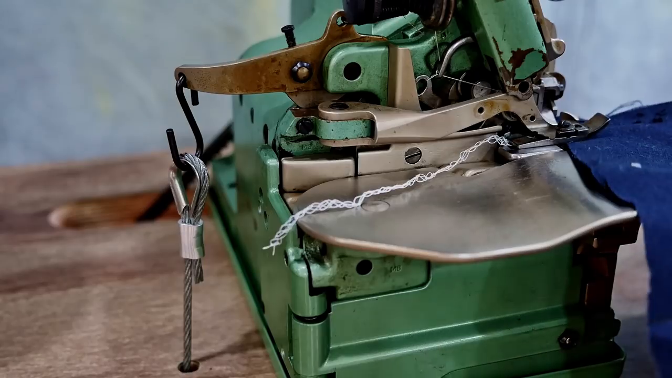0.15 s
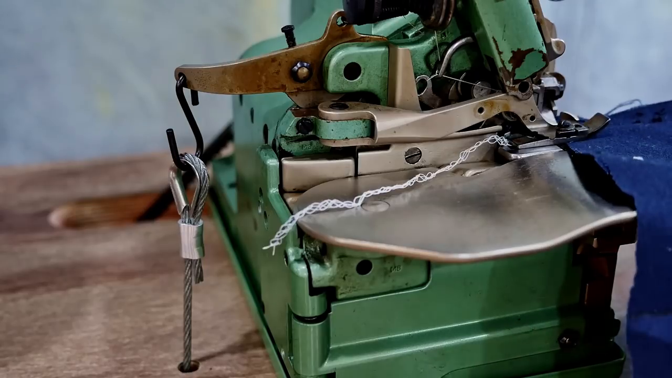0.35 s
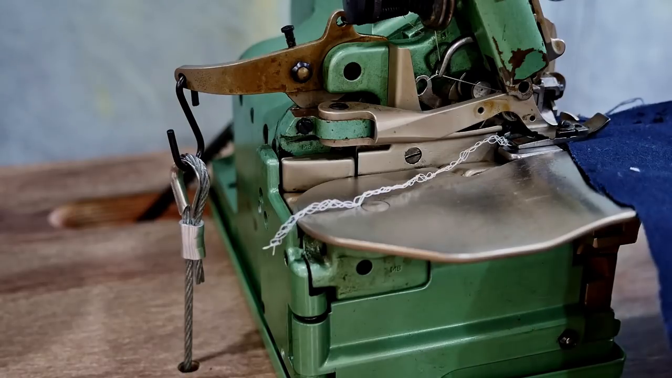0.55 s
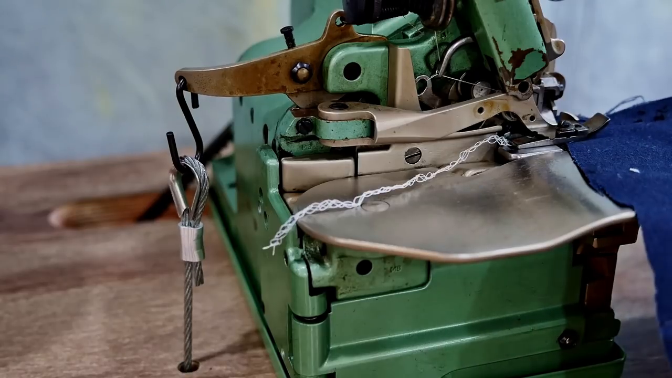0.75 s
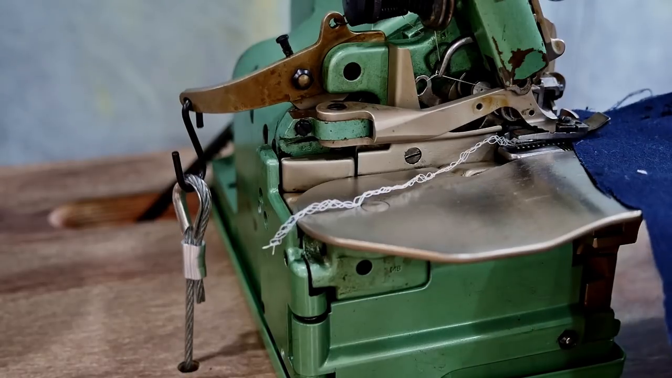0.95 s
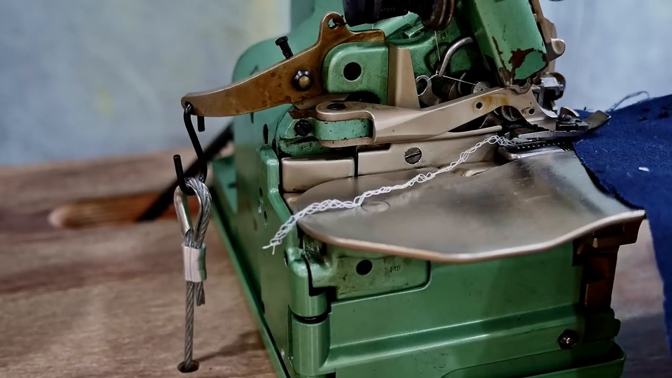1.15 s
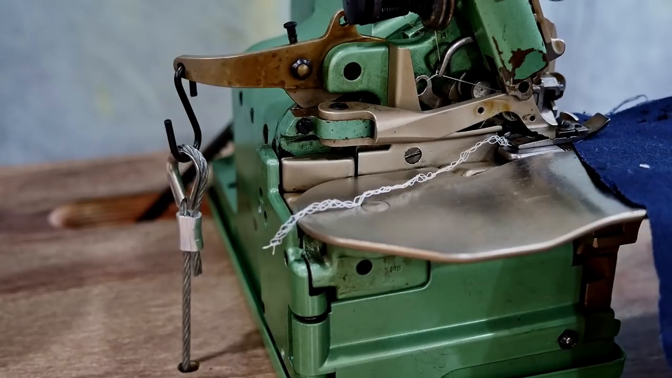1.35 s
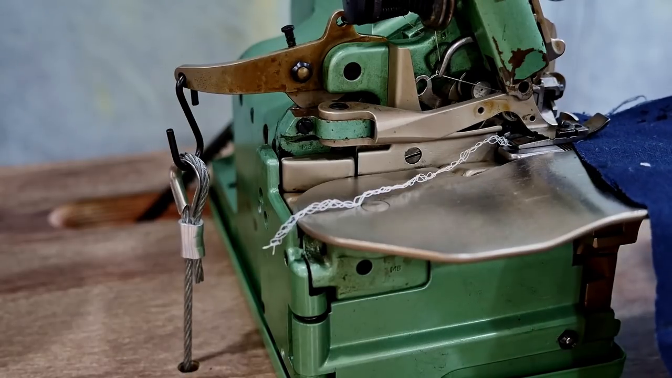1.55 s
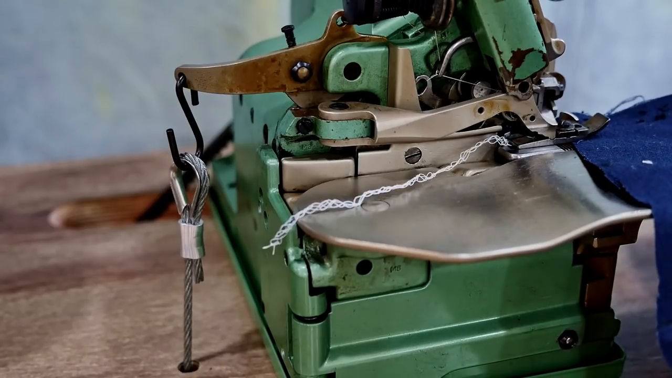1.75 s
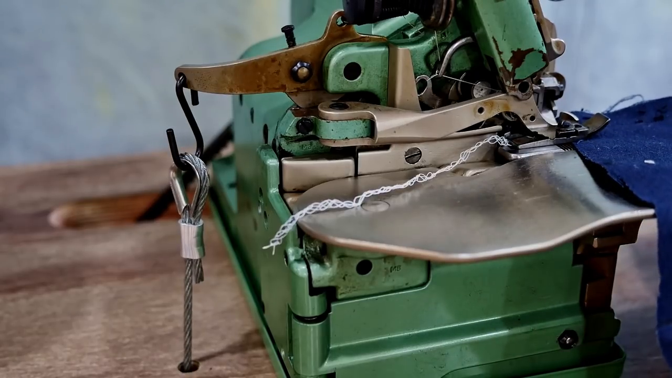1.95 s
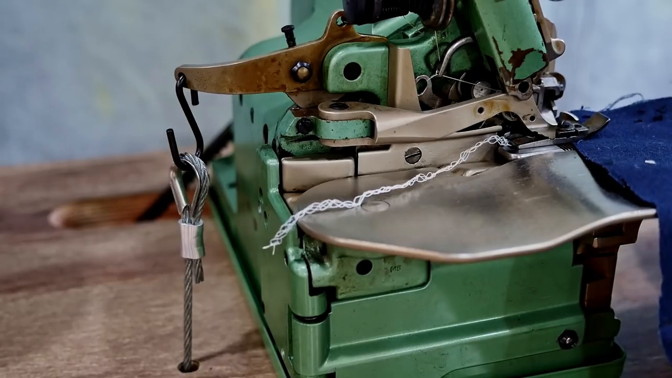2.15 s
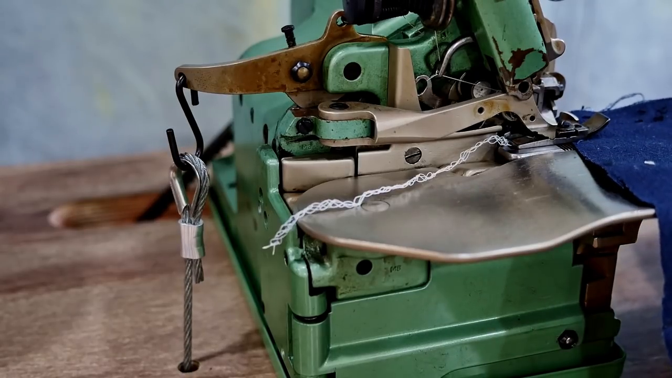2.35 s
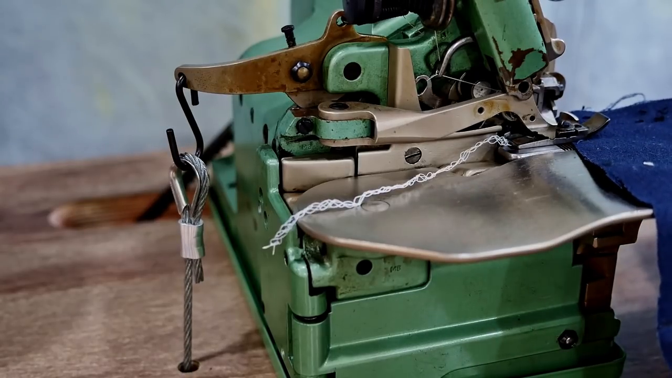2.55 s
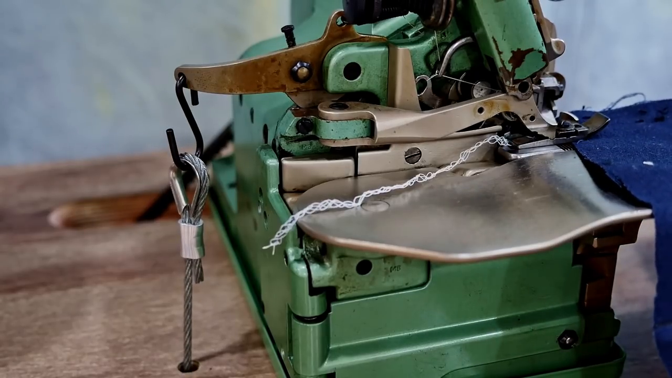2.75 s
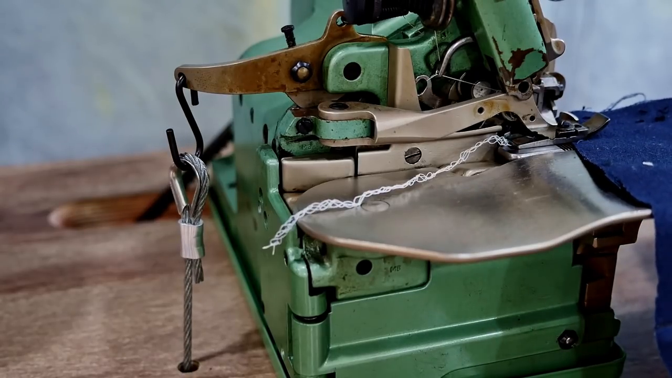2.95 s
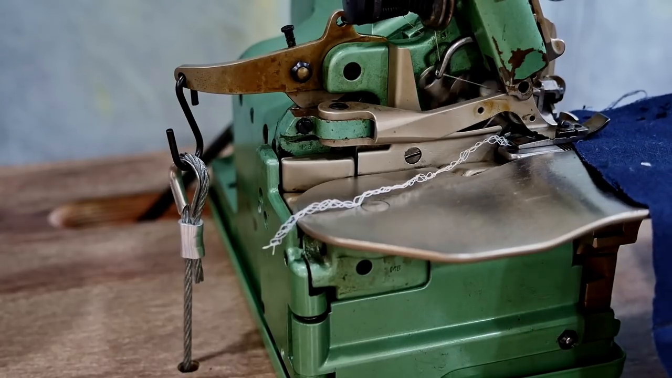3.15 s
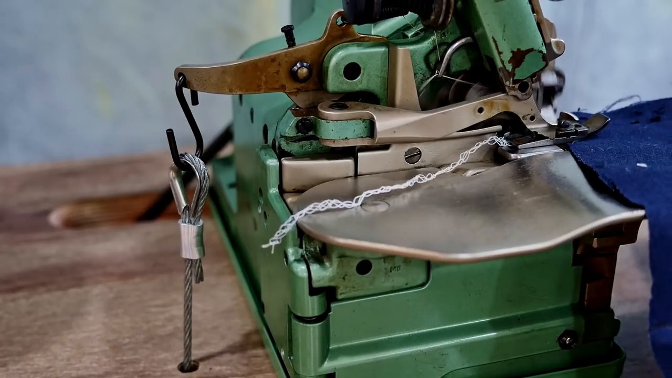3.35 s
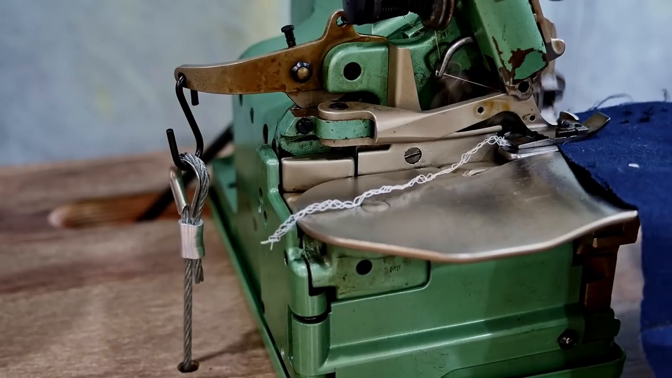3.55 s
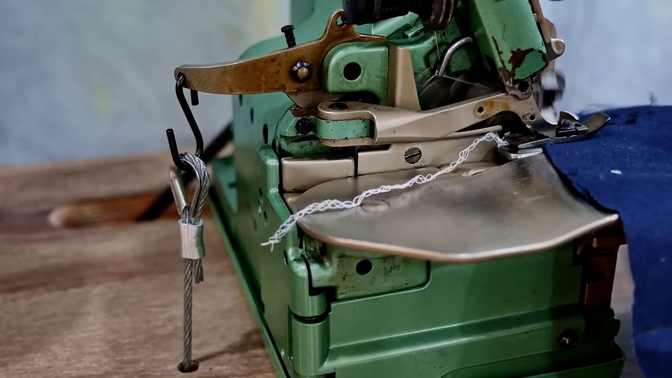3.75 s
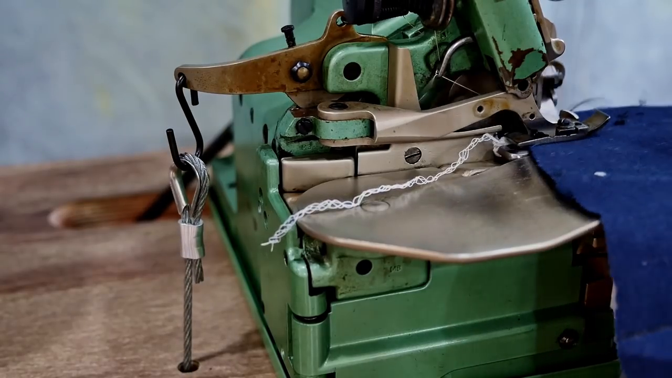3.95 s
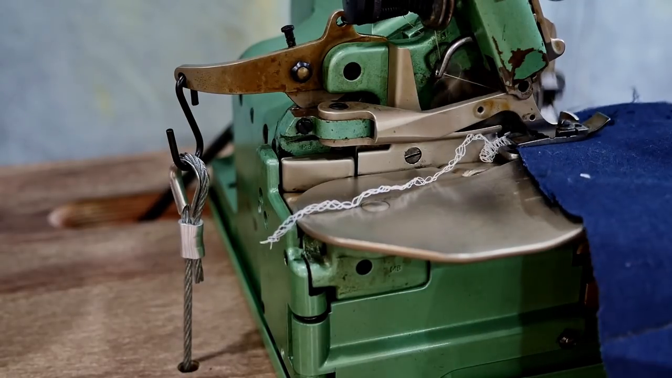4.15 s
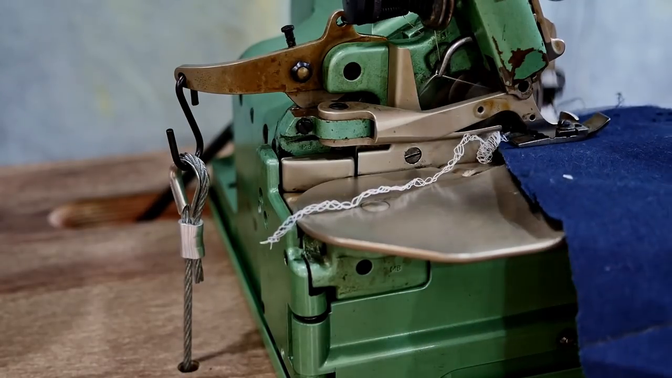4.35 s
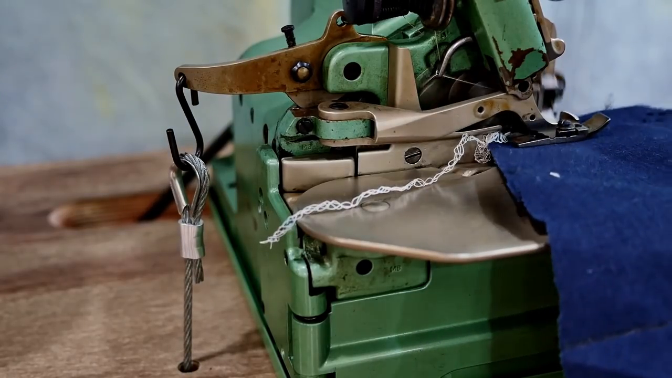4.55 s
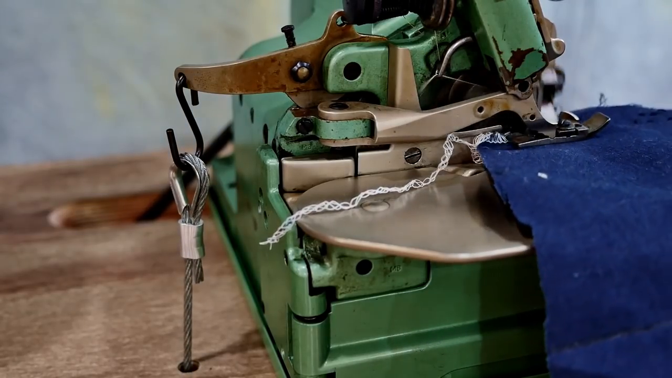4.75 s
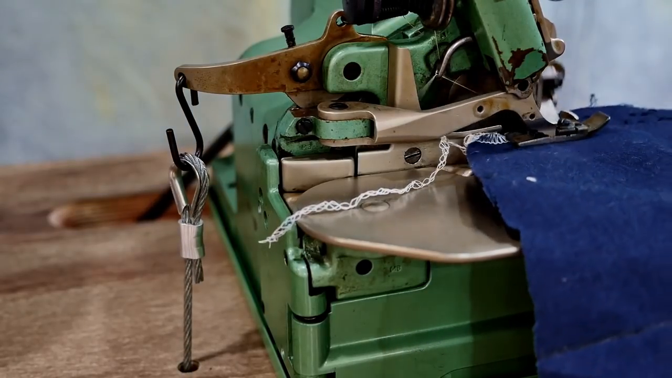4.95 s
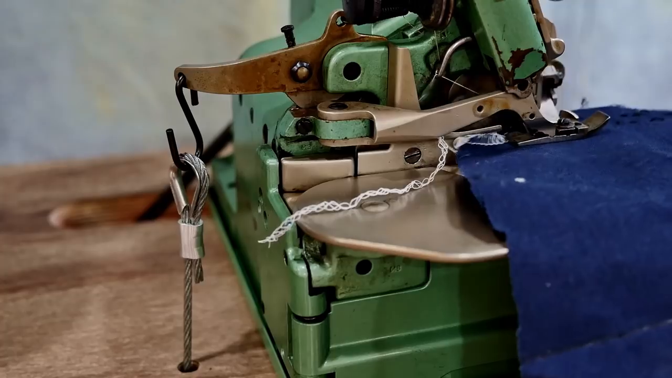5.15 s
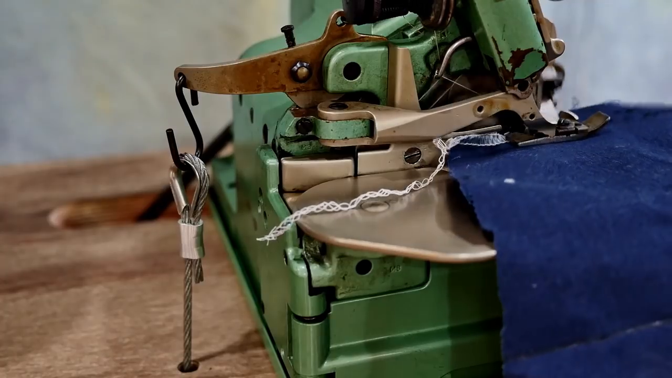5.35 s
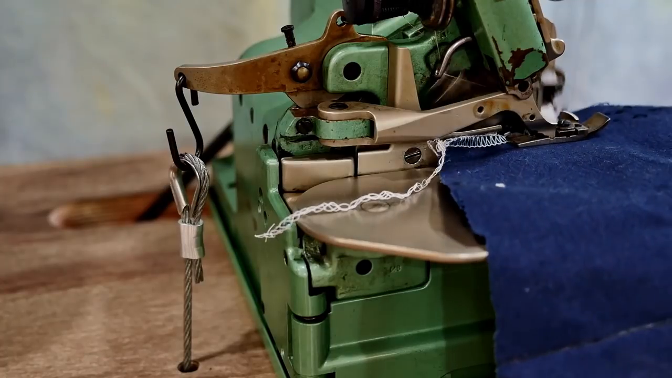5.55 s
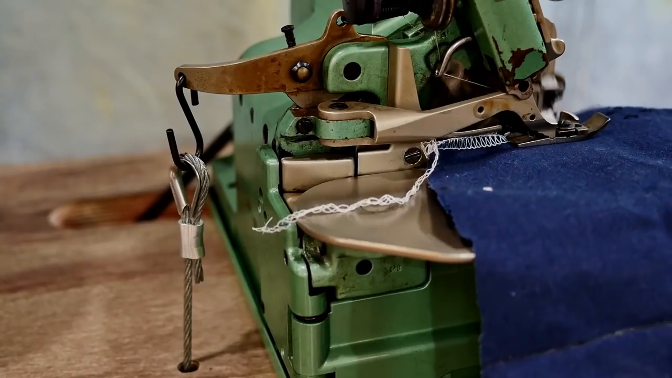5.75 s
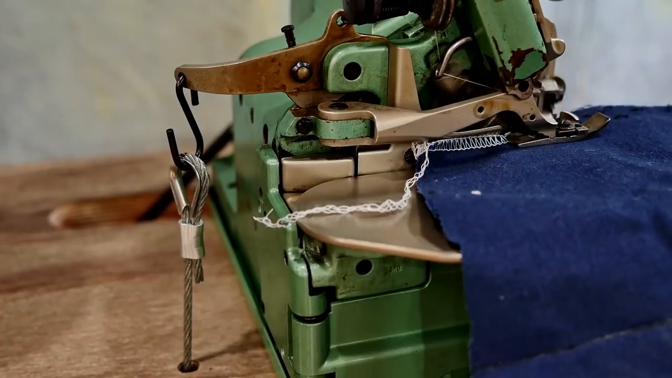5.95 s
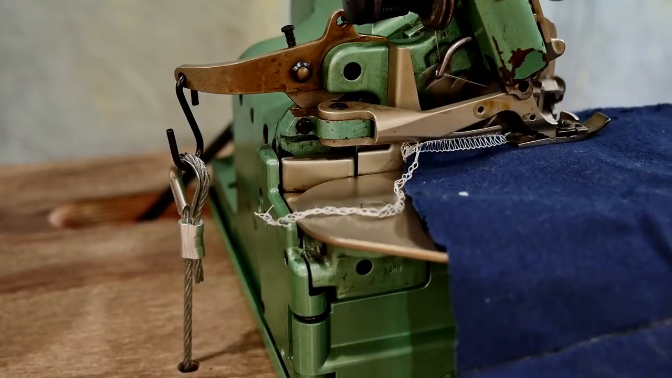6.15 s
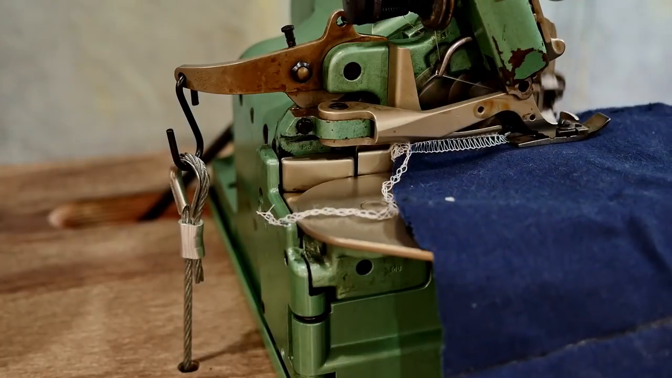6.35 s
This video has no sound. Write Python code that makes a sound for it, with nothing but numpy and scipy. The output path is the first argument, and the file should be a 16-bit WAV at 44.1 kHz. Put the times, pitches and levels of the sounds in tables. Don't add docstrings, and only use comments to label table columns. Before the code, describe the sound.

Quiet workshop idle with soft thuds and a metallic snap, then a sewing machine clutch catches and it stitches rapidly with a rattling steel whirr until the end.

```python
import sys
import numpy as np
from scipy import signal
from scipy.fft import rfft, irfft, next_fast_len
from scipy.io import wavfile
from scipy.ndimage import uniform_filter1d, map_coordinates

SR = 44100
rng = np.random.default_rng(int(sys.argv[2]) if len(sys.argv) > 2 else 0)


def dump(signal):
    limited = np.clip(np.atleast_2d(signal).T, -1, 1)
    pcm = np.round(limited * 32767).astype(np.int16)
    wavfile.write(sys.argv[1], SR, pcm)


def volts_from_db(level):
    exponent = np.asarray(level, float) / 20
    return 10 ** exponent


N = 283122
T = np.arange(N) / SR

# time in seconds, turns done (a whole number is a needle-bar knock).
SHAFT_TURNS = [(3.288, -1), (3.4312, 0), (3.5229, 1), (3.8955, 6), (4.1948, 10), (4.3459, 12), (4.4269, 13),
               (4.5184, 14), (4.6207, 15), (4.7283, 16), (6.4219, 32)]
# time in seconds, level in dB.
DRIVE = [(3.16, -85), (3.19, -65), (3.24, -54), (3.33, -52), (3.39, -44.5), (3.44, -36.5), (3.5, -31),
         (3.6, -33.5), (3.9, -34), (4.2, -33), (4.4, -33.5), (4.6, -34), (6.42, -34)]
RUNNING_DB = -34.5


def whirr():
    # depth in dB, crest in turns.
    swell_fast = [(1.1, 0.19), (2.3, 0.25)]
    swell_slow = [(2.37, .1), (1.05, 0.36)]
    # frequency in Hz, likeness (-1 to 1).
    likeness = [(60, 0.51), (240, 0.77), (950, 0.8), (3770, 0.84), (15000, 0.24)]
    # frequency in Hz, level in dB per Hz.
    body_colour = [(900, -36.5), (1150, -14), (1400, -9.5), (2500, -3.5), (3500, -6.5), (3950, -6),
                   (4500, -10.5), (5300, -7.5), (6000, -20.5), (8000, -54)]
    bench_colour = [(25, -32), (60, -21), (95, -0.5), (150, -10), (300, -11.5), (600, 0.5), (850, 1.5),
                    (1050, -2), (1500, -43.5)]
    fizz_colour = [(4500, -23), (6000, -3), (7000, -3), (7900, -10.5), (8500, -4), (9800, 0), (11000, -15),
                   (12800, -15), (13600, -11), (14600, -25), (16000, -19)]
    growl_db, growl_leads, growl_most_db = -10.5, 0.67, 7
    bench_fast_db, bench_slow_db, bench_leads = -11.5, -13.5, 0.45
    fizz_fast_db, fizz_slow_db, fizz_lag_s = -13, -16, 0.02
    bench_follows, fizz_follows = -0.098, 0.1
    lower_hz, upper_hz, tip_most_db = 793, 819, 2.5

    shaft = np.interp(T, *np.transpose(SHAFT_TURNS))
    slow = slowed(0.076, 0.017)

    def swing_db(rows):
        return sum(db * np.cos(2 * np.pi * (k + 1) * (shaft - crest)) for k, (db, crest) in enumerate(rows))

    def drive_db(t):
        return np.interp(t, *np.transpose(DRIVE), left=-120)

    load_fast_db = swing_db(swell_fast)
    load_db = load_fast_db + slow * (swing_db(swell_slow) - load_fast_db)
    body_db = drive_db(T)
    missing_db = np.clip(RUNNING_DB - body_db, 0, growl_most_db / growl_leads)
    bench_db = body_db + bench_fast_db + slow * (bench_slow_db - bench_fast_db)
    bench_db = bench_db + bench_leads * missing_db + bench_follows * load_db
    fizz_db = drive_db(T - fizz_lag_s) + fizz_fast_db + slow * (fizz_slow_db - fizz_fast_db)
    fizz_db = fizz_db + fizz_follows * load_db

    rattle = wobble(180)
    chance = rng.random((2500, 2))
    teeth = bursts(chance[:, 0] * T[-1], 11 * chance[:, 1] - 11, t60=0.0019)

    grind = patchy(pair(likeness, volts_from_db(0.29 * rattle) * (1 + teeth)), depth_db=1.0)
    body = coloured(grind, lambda hz: along(body_colour, hz) + casting_db(hz))
    growl = signal.sosfiltfilt(signal.butter(4, 1780, fs=SR, output="sos"), body)
    low_gain = volts_from_db(growl_db + growl_leads * missing_db)
    casting = unit(body - growl) + low_gain * unit(growl)

    def tip_db(hz):
        lower_peak = 1 / (1 + ((hz - lower_hz) / 18) ** 2)
        upper_peak = 1 / (1 + ((hz - upper_hz) / 18) ** 2)
        return tip_most_db * (lower_peak - upper_peak)

    shaken = pair(likeness, volts_from_db(0.5 * rattle + 1.16 * wobble(60)))
    lower = coloured(shaken, lambda hz: along(bench_colour, hz) + casting_db(hz) + tip_db(hz))
    upper = coloured(shaken, lambda hz: along(bench_colour, hz) + casting_db(hz) - tip_db(hz))
    bench = lower + slow * (upper - lower)

    scrape = volts_from_db(1.8 * rattle + 0.83 * wobble(320)) * (1 + 0.61 * teeth)
    fizz = coloured(patchy(pair(likeness, scrape), depth_db=1.0), lambda hz: along(fizz_colour, hz))
    return volts_from_db(body_db + load_db) * casting + volts_from_db(bench_db) * unit(bench) + volts_from_db(fizz_db) * unit(fizz)


def casting_db(hz):
    # centre in Hz, width in Hz, lift in dB.
    resonances = [(348, 108, 16), (522, 79, 8.5), (625, 6.8, 8.5), (782.5, 18, 13), (845.4, 53, 9.5),
                  (1402, 110, 10.5), (1552, 32, 8.5), (1958, 220, 6), (2313, 76, 7.5), (2526, 100, 7),
                  (2572, 48, 0.5), (2650, 39, 8), (2930, 82, 8.5), (3232, 78, 9.5), (3477, 30, 8.5),
                  (4190, 33, 6), (4800, 120, -25)]
    return sum(db / (1 + (2 * (hz - centre) / width) ** 2) for centre, width, db in resonances)


def patchy(x, depth_db):
    z = signal.stft(x, nperseg=256)[2]
    field = uniform_filter1d(rng.standard_normal(z.shape[1:]), size=3, axis=0)
    field = uniform_filter1d(field, size=4, axis=1)
    return signal.istft(z * volts_from_db(depth_db * unit(field)), nperseg=256)[1][:, :N]


def slowed(fast_s, span_s):
    turns_per_s = np.gradient(np.interp(T, *np.transpose(SHAFT_TURNS))) * SR
    return np.clip((1 / (turns_per_s + 1e-9) - fast_s) / span_s, 0, 1)


def clicks():
    # start in seconds, peak in dB, lower part in dB.
    strays = [(3.159, -55, -17), (3.186, -53, -18), (3.288, -44.5, -3), (3.3365, -42.5, -4.5),
              (3.423, -50, -2), (3.464, -41, -8), (4.6054, -33.5, -2), (5.241, -26.5, -1.5),
              (5.468, -37.5, 6), (5.9645, -35, -4), (6.0865, -47, 3), (6.1963, -53, -2), (6.4044, -34, 4)]
    # frequency in Hz, level in dB per Hz.
    high_colour = [(6500, -24), (8000, -17), (9300, 8), (10500, 8.5), (11500, -10), (13500, -10),
                   (15500, -17)]
    low_colour = [(3000, -6.5), (4300, -3), (4750, 11), (5450, 6), (6100, -1), (6800, 6), (7800, -4.5),
                  (9000, -21)]
    note_db, looper_note_db, slow_loss_db = 11.5, -13, 1.3
    bar_modes = [(4720, 0.5, 0.045), (5430, -5, 0.012)]  # Hz, dB, t60 in s

    turns = contacts()
    s, db, low_db = (np.append(a, b) for a, b in zip(turns, np.transpose(strays)))
    bar, t, slow = np.zeros(N + SR), T[:SR // 8], slowed(0.094, 0.012)
    for part, part_db in enumerate([0, looper_note_db]):
        for start in turns[0][:, part]:
            level_db = RUNNING_DB + note_db + part_db - slow_loss_db * slow[round(start * SR)]
            place(bar, start, volts_from_db(level_db) * ring(bar_modes, 0.3, 0.00015, t))
    high = crack(s, db, 0.014, high_colour)
    low = crack(s, db + low_db + 2, 0.017, low_colour)
    return high + low + bar[:N]


def contacts():
    # share of a turn, dB over drive when fast, the same when slow, lower part in dB, scatter in dB.
    meetings = [
        (0, 10, 3, 0.5, -1.3),
        (.325, -0.5, -4.5, -1, 2.5),
        (0.692, -2.5, -16, -1.5, 2),
        (.85, -43, -21, 6, 3),
    ]
    cloth_bites_s, free_share, free_db, free_low_db = 3.74, 0.47, 4, -8
    jitter_s = 0.00046

    at, turns = np.transpose(SHAFT_TURNS)
    share, fast_db, slow_db, low_db, scatter_db = np.transpose(meetings)
    turn = np.arange(turns[-1])[:, None]
    chance = rng.standard_normal((int(turns[-1]), 3, len(share)))
    is_looper = np.arange(len(share)) == 1
    free = (np.interp(turn, turns, at) < cloth_bites_s) & is_looper
    s = np.interp(turn + np.where(free, free_share, share), turns, at) + jitter_s * chance[:, 0]
    slow = np.interp(s - 0.01, T, slowed(0.094, 0.0118))
    drive_db = np.minimum(np.interp(s, *np.transpose(DRIVE)), RUNNING_DB)
    db = drive_db + fast_db + slow * (slow_db - fast_db)
    db = db + np.where(free, free_db, scatter_db * chance[:, 1])
    return s, db, np.where(free, free_low_db, low_db) + 0.73 * chance[:, 2]


def crack(times, levels_db, t60, spectrum):
    mean_db = 10 * np.log10(np.mean(volts_from_db(2 * along(spectrum, np.arange(SR // 2)))))
    noise = bursts(times, levels_db, t60) * pair([(1, 0.76)], np.ones(N))
    blow = bursts(times, levels_db, 1 / SR)
    return coloured(0.79 * noise + 3.23 * blow, lambda hz: along(spectrum, hz) - mean_db)


def handling():
    # start in seconds, peak in dB, clatter in dB, centre in Hz.
    thuds = [(0.632, -40, -12, 414), (0.656, -44, -10, 301), (0.689, -40.5, -21, 298),
             (0.724, -42, -6, 455), (0.749, -56, -25, 301), (1.053, -42.5, -11, 418), (1.094, -43, -8, 415),
             (1.137, -42.5, -34, 355), (1.189, -38.5, -14, 290), (1.213, -43, -10, 450),
             (1.296, -38.5, -5, 377), (1.31, -33.5, -29, 543), (1.324, -30.5, -19, 352),
             (1.334, -29, -27, 320), (1.446, -46, -24, 299), (2.181, -22.5, -3.5, 325),
             (2.193, -27.5, -23, 360), (2.205, -27.5, -34, 325)]
    # start in seconds, peak in dB.
    leans = [(1.052, -46.5), (1.129, -52.5), (1.199, -61), (1.311, -43.5), (2.18, -45), (3.169, -53.5),
             (3.249, -49.5)]
    # frequency in Hz, level in dB, relative t60.
    wood_modes = [(145.6, -2, 1.32), (225, -8, 0.36), (284, -6.5, 2.75), (324.4, 1, 0.65),
                  (360.5, -1, 0.77), (425, -7.5, 1.7), (536.5, 3.5, 0.79), (597, -3, 1.1),
                  (727, -5.5, 0.83)]
    # frequency in Hz, level in dB per Hz.
    loose_metal = [(90, -44), (400, -4), (800, -18.5), (1050, 0), (1225, -3), (1500, -4), (1690, 0),
                   (2000, -11.5), (2450, -7), (2900, -16.5), (5000, -28.5), (9000, -43)]
    contact_s, soft_db, hardens = 0.0029, -31.5, 0.91
    sings, hard_db = 0.29, -23
    chatter_db = 2.3

    blows = []  # s, dB, clatter dB, contact s, t60 s, centre Hz
    for s, db, clatter_db, centre_hz in thuds:
        contact = contact_s * volts_from_db(-hardens * max(db - soft_db, 0))
        blows.append((s, db, clatter_db, contact, 0.084, centre_hz))
    for s, db in leans:
        blows.append((s, db, -30, 0.0077, 0.21, 140))

    out, shake, t = np.zeros(N + SR), np.zeros(N + SR), T[:SR // 2]
    for s, db, clatter_db, contact, t60, centre_hz in blows:
        wood = [(hz, level - 12.6 * np.log2(hz / centre_hz) ** 2, t60 * k) for hz, level, k in wood_modes]
        place(out, s, volts_from_db(db - 3) * ring(wood, 2.5, contact, t))
        lever = [(1206, -4.0, 1.9 * t60), (1238, -4.0, 2.87 * t60), (2473, -12, 1.1 * t60)]
        lever_db = db + clatter_db - 1.5 + sings * (db - hard_db)
        place(out, s, volts_from_db(lever_db) * ring(lever, 1.5, contact, t))
        shake_db = db + clatter_db + 5.5 - 60 * t / (2.76 * t60)
        place(shake, s, volts_from_db(shake_db) * (1 - np.exp(-t / contact)))
    ringing = signal.sosfilt(signal.butter(4, 105, "high", fs=SR, output="sos"), out[:N])
    chatter = shake[:N] * volts_from_db(chatter_db * wobble(250)) * rng.standard_normal(N)
    return ringing + coloured(chatter, lambda hz: along(loose_metal, hz))


def snaps():
    # start in seconds, peak in dB, low edge in Hz, high edge in Hz, t60 in seconds.
    snap_events = [
        (1.283, -43, 4200, 4900, .012),
        (1.296, -26, 1430, 10500, 0.014),
        (2.182, -45, 990, 6000, 0.025),
        (2.92, -62, 1500, 9000, 0.027),
        (3.158, -31.5, 1250, 4800, 0.045),
    ]
    out, t = np.zeros(N + SR), T[:SR // 8]
    for s, db, low_hz, high_hz, t60 in snap_events:
        band = signal.butter(3, [low_hz, high_hz], "band", fs=SR, output="sos")
        noise = volts_from_db(-60 * t / t60) * rng.standard_normal(len(t))
        place(out, s, volts_from_db(db) * signal.sosfilt(band, noise))
    return out[:N]


def cloth():
    # start in seconds, peak in dB, hold in seconds.
    rustles = [(0.0, -59.5, 0.013), (0.155, -65.5, 0.11), (0.348, -71.5, .03), (0.62, -66.5, 0.027),
               (0.886, -70, .03), (1.1, -66, .005), (1.28, -68, .005), (2.926, -59.5, 0.0041),
               (3.08, -72, 0.018)]
    # frequency in Hz, level in dB per Hz.
    weave = [(500, -17), (1500, 4.5), (3000, 2), (5500, 0.5), (9000, -6.5), (12000, -9)]
    rise_db_per_s, fade_db_per_s = 700, 140
    level = np.zeros(N)
    for s, db, hold in rustles:
        before_s = np.clip(s - T, 0, None)
        after_s = np.clip(T - s - hold, 0, None)
        level += volts_from_db(db - rise_db_per_s * before_s - fade_db_per_s * after_s)
    grain = pair([(1, 0.61)], volts_from_db(1.3 * wobble(120)))
    return level * unit(coloured(grain, lambda hz: along(weave, hz)))


def shop_floor():
    # frequency in Hz, level in dB rms.
    motor_lines = [(236.9, -69), (296.1, -63), (705.2, -86), (1427, -92), (1707, -83.5), (2186, -88),
                   (3182, -83.5)]
    # frequency in Hz, level in dB per Hz.
    air_colour = [(25, -18), (70, -23), (150, -8), (330, -8), (450, -11.5), (800, -20), (1700, -21),
                  (3200, -30.5), (8000, -34.5), (15000, -40)]
    # frequency in Hz, likeness (-1 to 1).
    air_likeness = [(60, -0.1), (180, 0.2), (550, -0.35), (1650, -0.16), (4970, 0.5), (15000, 0.3)]
    air = unit(coloured(pair(air_likeness, np.ones(N)), lambda hz: along(air_colour, hz)))
    hum = np.zeros(N)
    for hz, db in motor_lines:
        level = np.sqrt(2) * volts_from_db(db + 1.6 * wobble(9))
        hum += level * np.sin(2 * np.pi * hz * T + 0.91 * wobble(4.4))
    return volts_from_db(-59 + 0.2 * wobble(3.28)) * air + hum * volts_from_db([[1.5], [-1.5]])


def room(x):
    # frequency in Hz, t60 in seconds.
    decay = [(200, 0.28), (2000, 0.5), (10000, 0.31)]
    hz, t, z = signal.stft(rng.standard_normal((2, SR // 2)), SR, nperseg=256)
    tail = signal.istft(z * volts_from_db(-60 * t / along(decay, hz)[:, None]), SR, nperseg=256)[1]
    tail = tail / np.linalg.norm(tail[0])
    return signal.fftconvolve(np.pad(x, (200, 0))[None], tail, axes=1)[:, :N]


def bursts(times, levels_db, t60):
    blows = np.bincount(np.round(np.array(times) * SR).astype(int), volts_from_db(levels_db), N)[:N]
    return signal.lfilter([1], [1, -volts_from_db(-60 / (t60 * SR))], blows)


def ring(modes, scatter_db, attack, t):
    out = np.zeros(len(t))
    for hz, db, t60 in modes:
        out += volts_from_db(db + rng.normal(0, scatter_db) - 60 * t / t60) * np.sin(2 * np.pi * hz * t)
    return out * (1 - np.exp(-t / attack))


def place(out, start_s, blow):
    out[round(start_s * SR):][:len(blow)] += blow


def pair(alike, grit):
    z = rfft(grit * rng.standard_normal((2, N)))
    angle = np.arccos(np.clip(along(alike, np.fft.rfftfreq(N, 1 / SR)), -0.99, 0.99)) / 2
    mid, side = irfft(z * [np.cos(angle), np.sin(angle)], N)
    return np.array([mid + side, mid - side])


def coloured(x, gain_db):
    m = 2 * next_fast_len(N // 2 + 4096)
    cepstrum = irfft(np.log(volts_from_db(gain_db(np.fft.rfftfreq(m, 1 / SR))) + 1e-6), m)
    cepstrum[1:m // 2] *= 2
    cepstrum[m // 2 + 1:] = 0
    return irfft(rfft(x, m) * np.exp(rfft(cepstrum)), m)[..., :N]


def wobble(rate):
    return map_coordinates(rng.standard_normal(int(N * rate / SR) + 4), [T * rate])


def along(points, hz):
    f, v = np.transpose(points)
    return np.interp(np.log(hz + 1), np.log(f + 1), v)


def unit(x):
    return x / np.sqrt(np.mean(x ** 2) + 1e-20)


def scene():
    hands, snap, steel = handling(), snaps(), clicks()
    machine = (whirr() + steel) * volts_from_db([[-0.5], [0.5]])
    answer = volts_from_db(-5) * room(hands) + volts_from_db(-7.5) * room(snap) + volts_from_db(-19) * room(steel.mean(0))
    return machine + hands + snap + answer + cloth() + shop_floor()


def roll_off(x):
    return signal.sosfilt(signal.butter(12, 15860, fs=SR, output="sos"), x)


def record(dry):
    # frequency in Hz, gain in dB.
    mic_response = [(20, -8), (60, -4), (110, 2), (7600, -1), (7900, -5), (8200, 1), (15300, -8),
                    (15900, -23)]
    heard = coloured(dry, lambda hz: along(mic_response, hz))
    return roll_off(heard)


dry = scene()
out = record(dry)
dump(out)
```